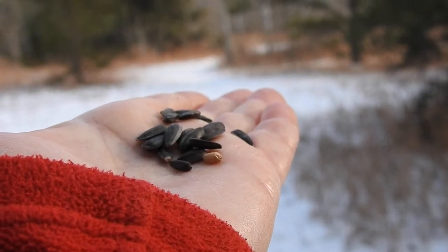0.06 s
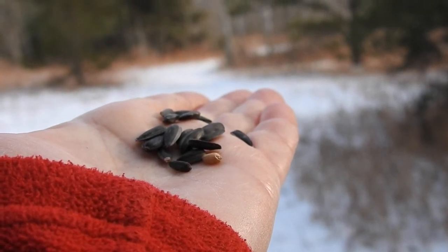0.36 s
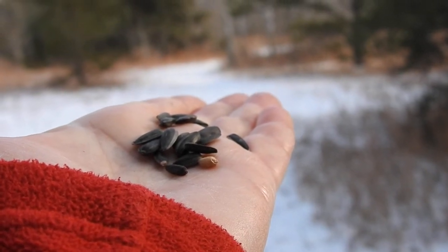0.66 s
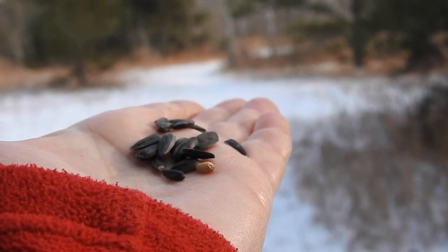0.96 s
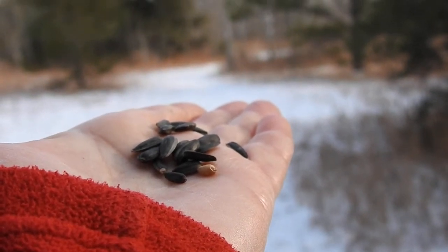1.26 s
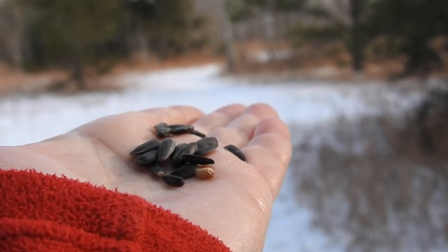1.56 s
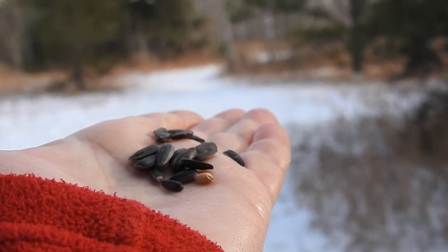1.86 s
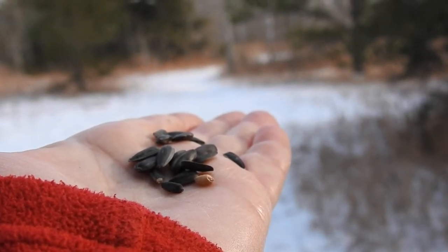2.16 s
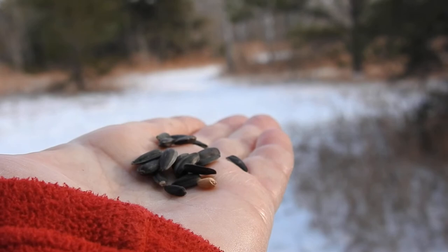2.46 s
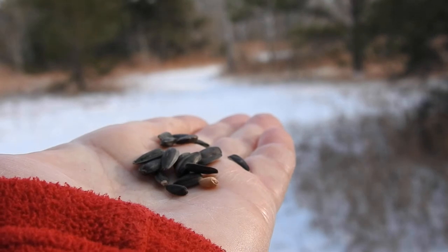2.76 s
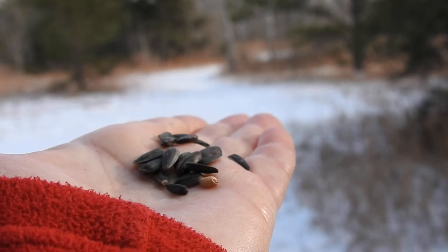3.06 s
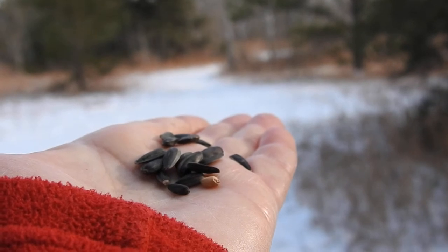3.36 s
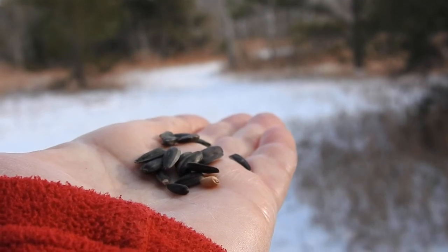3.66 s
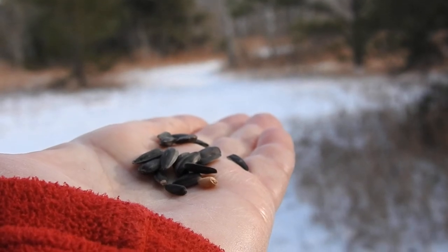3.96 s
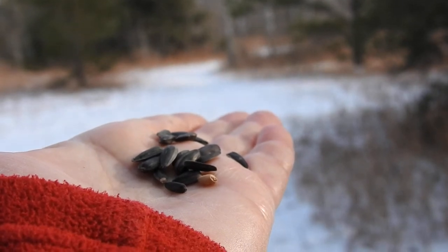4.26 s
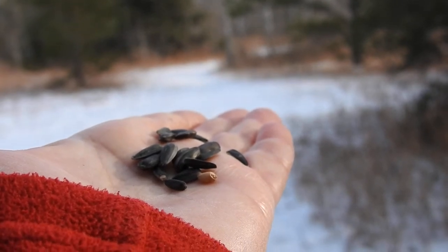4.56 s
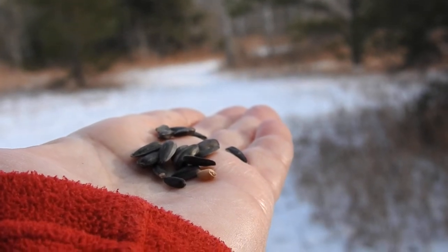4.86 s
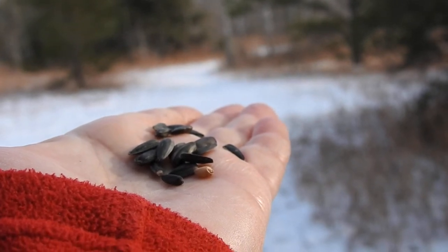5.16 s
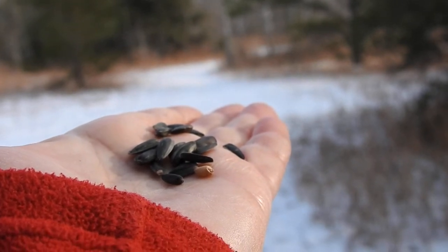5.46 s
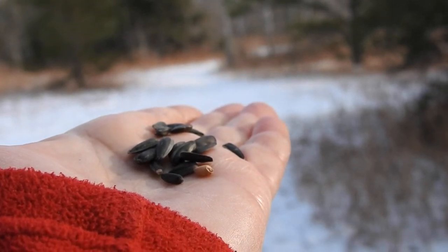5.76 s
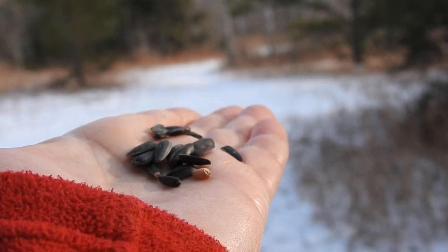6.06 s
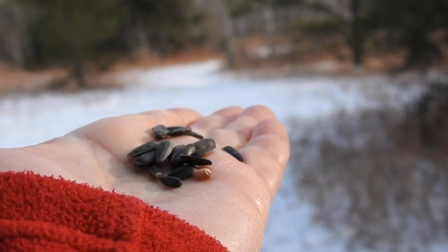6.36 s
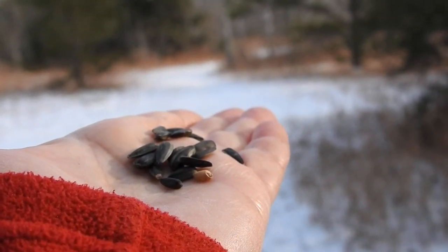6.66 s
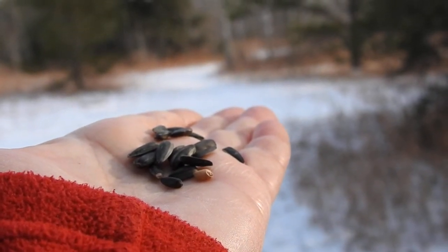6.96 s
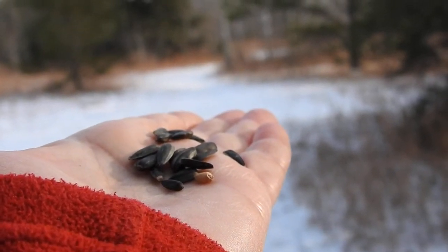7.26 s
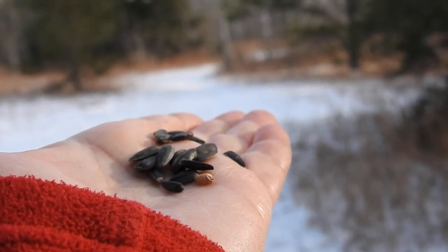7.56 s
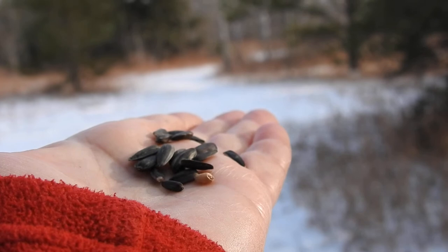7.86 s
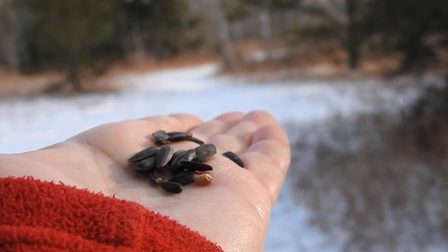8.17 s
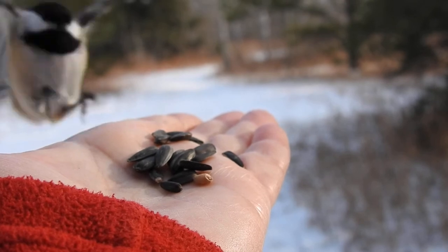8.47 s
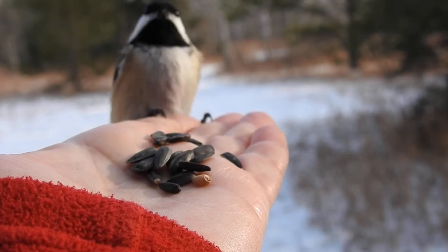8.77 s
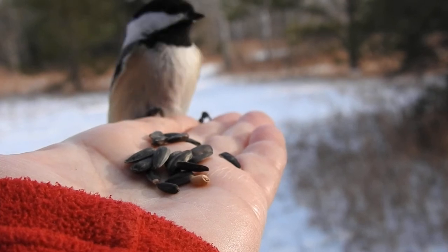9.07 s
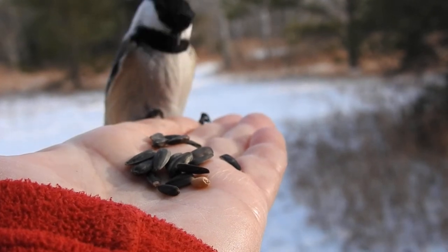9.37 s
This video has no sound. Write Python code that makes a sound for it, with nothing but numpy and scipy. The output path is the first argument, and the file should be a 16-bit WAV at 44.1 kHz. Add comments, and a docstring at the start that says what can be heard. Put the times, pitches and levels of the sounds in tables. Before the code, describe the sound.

Chickadees call close by in snowy woods with short, thin, high whistles and raspier notes. Wings flutter softly, then two sharp chips ring out, the first with a tiny click. A loud twitter with one brief squawk follows, then three loud notes, more wingbeats and softer calls. Faint distant traffic, an engine hum and an even hiss lie underneath, and the trees add a slight echo.

```python
"""Chickadees call around a hand full of seed in snowy woods, over far traffic and an engine hum.
First come thin, high whistles (seets) and lower, raspy notes (tsits), made by each bird's two-sided
voice box. Wings flutter near 3 s, then two sharp chips ring out, the louder with a recorder overload click.
Around 6 s a bird twitters, with one squawk. Three loud tsits follow, then more wingbeats and softer calls.
Trunks scatter the sounds."""
import sys
import numpy as np
from scipy import signal
from scipy.fft import rfft, irfft, next_fast_len
from scipy.io import wavfile
from scipy.ndimage import uniform_filter1d, minimum_filter1d

SR = 44100
rng = np.random.default_rng(int(sys.argv[2]) if len(sys.argv) > 2 else 0)


def master_out(mix):
    """Clip the mix to full scale and print it as 16-bit PCM to the path in sys.argv[1]."""
    frames = np.transpose(np.atleast_2d(mix))
    ceiling = np.clip(frames, -1, 1)
    pcm = np.round(ceiling * 32767).astype(np.int16)
    wavfile.write(sys.argv[1], SR, pcm)


N = 419832
T = np.arange(N) / SR

# One tsit a row: start_s, length_s, top_pitch_hz, level_db, swell_db, rasp_db, left_lead_radians
TSIT_NOTES = [(0.094, 0.056, 6040, -30.5, 5, -20, .25), (2.717, 0.07, 5540, -45.5, -5, -2.5, .4),
              (5.038, 0.04, 5320, -46, -24.5, -9.5, .45), (5.399, 0.054, 5880, -39.5, -9.5, -4, 0.57),
              (6.546, 0.053, 6240, -11.5, -8, -23, -1), (6.774, .053, 6340, -10.5, 4, -24.5, -.9),
              (7.38, 0.047, 6246, -11.5, -2, -25.5, -0.83), (8.474, 0.065, 5590, -36.5, 3, -8, -1.04),
              (8.591, 0.096, 5790, -40.5, -7, -8.5, -1.06), (9.046, 0.075, 5860, -37, 5, -3, -.9),
              (9.12, 0.04, 5430, -38.5, 2, -12, -.8), (9.432, 0.066, 5980, -39.5, -1, -3, -.9)]
# One list of points for each twittered phrase: time_s, pitch_hz, level_db, rasp_db
TWITTER_PHRASES = [
    [(5.800, 5650, -29, -28.5), (5.818, 5900, -12.5, -31), (5.842, 5750, -15, -38.5),
     (5.855, 6020, -25.5, -25.5), (5.873, 6300, -14.5, -23.5), (5.894, 5420, -12.5, -30.5),
     (5.907, 6350, -21, -20), (5.928, 6450, -16.5, -17), (5.947, 5400, -21.5, -15)],
    [(6.059, 5460, -25, -19), (6.074, 6190, -10.5, -19), (6.098, 6300, -15, -18), (6.120, 5600, -29, -17),
     (6.143, 6400, -25.5, -15), (6.165, 6500, -11.5, -19), (6.185, 6100, -19, -18),
     (6.201, 6550, -11, -8.5), (6.215, 5600, -12.5, -6)],
    [(6.277, 5500, -5, -17.5), (6.291, 6080, -10.5, -18.5), (6.312, 6420, -13, -27),
     (6.343, 6254, -9.5, -22), (6.354, 5080, -34, -10)],
]


def undb(db):
    """Turn decibels into a number to multiply by."""
    return 10 ** (np.asarray(db) / 20)


def curves(rows, t):
    """Join the points in each column of a table with straight lines in time."""
    times, *columns = np.transpose(rows)
    return [np.interp(t, times, column) for column in columns]


def unit(x):
    """Scale a sound to an average power of 1."""
    return x / np.sqrt(np.mean(np.abs(x) ** 2))


def coloured(points):
    """Noise whose tone colour follows points of pitch_hz, level_db."""
    hz, db = np.transpose(points)
    all_hz = np.arange(1, N // 2 + 2) * SR / N
    gain = undb(np.interp(np.log(all_hz), np.log(hz), db))
    return unit(irfft(rfft(rng.standard_normal(N)) * gain, N))


def wobble(n, width_hz):
    """A random wobble (complex noise); multiplying a tone by it smears the tone into a band."""
    size = next_fast_len(max(n, SR // 4))
    white = rng.standard_normal(size) + 1j * rng.standard_normal(size)
    band = np.exp(-.5 * (np.fft.fftfreq(size, 1 / SR) / width_hz) ** 2)
    return unit(np.fft.ifft(white * band))[:n]


def turn(hz):
    """How far a wave has turned, in radians, as it follows a pitch curve."""
    return 2 * np.pi * np.cumsum(hz) / SR


def gate(t, length, attack_s, release_s):
    """Fade in, hold and fade out."""
    return np.sin(np.pi / 2 * np.clip(np.minimum(t / attack_s, (length - t) / release_s), 0, 1)) ** 2


def add(out, start_s, sound):
    """Mix a stereo sound in at start_s."""
    i = max(int(start_s * SR), 0)
    out[:, i:i + sound.shape[1]] += sound[:, :N - i]


def stereo(tone, lead, left_db=1):
    """Two close microphone openings hear a tone out of step: the left is ahead by lead radians."""
    half = np.exp(.5j * lead) * undb(left_db / 2)
    return np.sqrt(2) * np.real([tone * half, tone / half])


def hiss(level_db=-59):
    """A faint, even hiss, unrelated on the left and right."""
    # Tone colour of the hiss: pitch_hz, level_db
    colour = [(100, -6), (1500, 0), (3000, 0), (5000, -.5), (6700, 0), (8500, -4), (11000, -8.5),
              (13000, -11), (15500, -12)]
    return undb(level_db) * np.array([coloured(colour), coloured(colour)])


def traffic(rumble_trim_db=1, roar_trim_db=-2, side_db=-16, left_db=1.4, split_hz=500):
    """A far road: rumble and singing tyres swell separately, and an engine drones with a wavering pitch."""
    # Tone colour of the road noise: pitch_hz, level_db
    road_colour = [(20, -45.5), (35, -20.5), (50, -6), (75, -1), (130, -5.5), (250, -8.5), (420, -10),
                   (700, -4.5), (1020, -5), (1250, -16), (1550, -24.5), (2200, -36), (4000, -33.5),
                   (12000, -66.5)]
    # How the traffic rises and falls, before the trims: time_s, rumble_db, roar_db
    road_levels = [(0, -44.5, -48), (1.1, -47.5, -49), (1.5, -48.5, -51.5), (2.6, -49, -47.5),
                   (3.3, -45, -46), (5.1, -45, -47.5), (5.5, -47, -44), (7.2, -46.5, -44.5),
                   (8.2, -49, -49.5), (9.52, -47.5, -45)]
    # The engine's tones, lowest first, before the swell: pitch_hz, level_db
    engine_tones = [(100.5, -52), (202.5, -58.5), (302.5, -56), (404, -61), (512, -58)]
    # Swell of the lowest (firing) tone and of the others: time_s, firing_db, upper_db
    engine_swell = [(0, 0.5, 8.5), (1.3, 6, 6.5), (1.8, -4, 3), (3.1, 2.5, 4), (7, -5.5, -1.5), (7.9, 3, 0),
                    (9.52, 3, 1.5)]
    # Tones sung by the tyre tread: pitch_hz, relative_level_db
    tread_tones = [(594, -13.5), (1032, -13)]
    rumble_db, roar_db = curves(road_levels, T)
    road = coloured(road_colour) + undb(side_db) * np.array([[1], [-1]]) * coloured(road_colour)
    rumble = signal.sosfiltfilt(signal.butter(2, split_hz, fs=SR, output="sos"), road)
    out = unit(rumble) * undb(rumble_db + rumble_trim_db)
    out += unit(road - rumble) * undb(roar_db + roar_trim_db)
    firing_db, upper_db = curves(engine_swell, T)
    speed = 1 + .008054 * wobble(N, .656).real
    for k, (hz, db) in enumerate(engine_tones):
        drone = np.exp(1j * turn(hz * speed)) * (1 + 1.09 * wobble(N, 13))
        out += np.sqrt(2) * unit(drone).real * undb(db + (upper_db if k else firing_db))
    for hz, db in tread_tones:
        whine = np.exp(1j * turn(hz * speed)) * wobble(N, 3.7)
        out += unit(whine.real) * undb(db + 2 * roar_db - roar_db.mean())  # swells more than the roar
    return out * undb(np.array([[left_db], [-left_db]]) / 2)


def woods(sound, snow_delay_s=.0052, snow_db=-14):
    """One early echo comes off the snow, then twigs, trunks and the wider forest scatter the sound."""
    # Hand and twigs, trunks, forest: level_db, seconds to fade by 60 dB
    scatter = [(-15, .13), (-20, .26), (-28, .81)]
    t = np.arange(SR) / SR
    build_up = np.clip(t / .023, 0, 1)
    echoes = sum(undb(db) * unit(rng.standard_normal((2, SR)) * undb(-60 * t / fade_s) * build_up)
                 for db, fade_s in scatter) / np.sqrt(SR)
    echoes[:, int(snow_delay_s * SR)] += undb(snow_db)
    return sound + signal.fftconvolve(sound, echoes, axes=1)[:, :N]


def overload_click(start_s=3.787, level_db=-20, decay_s=.0002):
    """A brief recorder overload click on the loudest chip."""
    out = np.zeros((2, N))
    t = np.arange(SR // 200) / SR
    add(out, start_s, undb(level_db) * rng.standard_normal((2, len(t))) * np.exp(-t / decay_s))
    return out


def wings(beat_hz=23.06, swish_s=.014, thump_s=.012, ruffle=.61, side=.3):
    """Wings beat in short bursts; each stroke swishes through the feathers and pushes a puff of air."""
    # Bursts of wingbeats: start_s, length_s, swish_db, thump_db
    flights = [(2.846, .1, -53, -54), (3.027, .31, -47, -42), (3.438, .19, -51, -61),
               (4.249, .02, -49.5, -70), (7.458, .1, -54.5, -47), (7.673, .06, -50.5, -43),
               (7.909, .1, -53, -47), (8.157, .1, -59, -47), (8.339, .06, -51, -34), (8.413, .06, -57, -53)]
    # Tone colour of the feather swish: pitch_hz, level_db
    feather_colour = [(400, -37), (1200, 5.5), (2300, -1), (3500, -1.5), (5000, 3), (6700, 7.5), (8200, -8),
                      (10000, -15.5), (13000, -38), (16000, -18.5)]
    # Tone colour of the puff of air: pitch_hz, level_db
    air_colour = [(25, -24), (70, 0), (130, 4), (230, 0), (400, -8), (1000, -43), (3000, -70)]
    swish, thump = np.zeros(N), np.zeros(N)
    for start_s, length_s, swish_db, thump_db in flights:
        efforts_db = -2 * rng.standard_normal(20)  # no two strokes are equally strong
        for stroke_s, effort_db in zip(np.arange(start_s, start_s + length_s, 1 / beat_hz), efforts_db):
            near = np.abs(T - stroke_s) < .08
            t = T[near] - stroke_s
            swish[near] += undb(swish_db + effort_db) / (1 + (t / swish_s) ** 2)
            thump[near] += undb(thump_db + effort_db) * np.exp(-.5 * ((t + .014) / thump_s) ** 2)
    swish *= np.exp(ruffle * wobble(N, 150).real)
    feathers = coloured(feather_colour) + side * np.array([[1], [-1]]) * coloured(feather_colour)
    return swish * feathers + thump * coloured(air_colour)


def voice_box(top_hz, contour, db, rasp_db, lead, *, octave_db, under_db, sum_db, breath_db, smear_hz,
              under_width_hz, attack_s, waver, left_db, quiver=.23, buzz=0, buzz_hz=430,
              under_hz=3600, under_hz_per_db=18, beak_hz=5800, breath_width_hz=2700):
    """One side of a bird's voice box whistles; the other adds an unsteady undertone and rasp."""
    n, hz = len(contour), top_hz * contour
    t, length = np.arange(n) / SR, n / SR
    phase = turn(hz * (1 + waver * wobble(n, 160).real))
    whistle = np.exp(1j * phase)
    # the undertone bends with the whistle and sits higher in raspier notes
    undertone = np.exp(1j * turn((under_hz + under_hz_per_db * rasp_db) * contour))
    # the two voices mix into a tone at the sum of their pitches
    second_voice = wobble(n, under_width_hz) * undertone * (undb(under_db) + undb(sum_db) * whistle)
    # swirling air smears the whistle
    swirl = wobble(n, smear_hz) + undb(breath_db) * wobble(n, breath_width_hz)
    rasp = swirl * np.exp(1.06j * phase) + second_voice
    # the beak lets less of the octave out as the pitch climbs
    octave = undb(octave_db) * whistle ** 2 / (1 + (hz / beak_hz) ** 20)
    voice = whistle + octave + undb(rasp_db) * rasp * np.sin(np.pi * t / length) ** .94
    voice *= 1 + quiver * wobble(n, 130).real  # the air flow quivers
    # a forced note breaks into quick, uneven pulses
    pulses = np.cos(turn(buzz_hz * (1 + .92 * wobble(n, 200).real)))
    voice *= np.exp(buzz * pulses - buzz ** 2 / 2)
    return stereo(voice * undb(db) * gate(t, length, attack_s, release_s=.0033), lead * contour, left_db)


def notes(table, start, end, drop_s, hump_db, end_db, arch, sag, bend, **voice):
    """Each note arches up, sags, then snaps down and fades; start and end are shares of its top pitch."""
    out = np.zeros((2, N))
    for start_s, length_s, top_hz, level_db, swell_db, rasp_db, lead in table:
        t = np.arange(int(length_s * SR)) / SR
        hold_s = max(length_s - drop_s, length_s / 4)
        rise = np.clip(t / hold_s, 0, 1)
        fall = np.clip((t - hold_s) / (length_s - hold_s), 0, 1)
        droop = sag * rise ** 5 * (1 - fall)
        scoop = (1 - start) * (1 - rise) ** arch
        snap = (1 - end) * np.sin(np.pi / 2 * fall ** bend) ** 2
        db = level_db + swell_db * (rise - .5) - hump_db * (2 * rise - 1) ** 2
        db += np.minimum(end_db - db, 0) * fall ** .8
        add(out, start_s, voice_box(top_hz, 1 - droop - scoop - snap, db, rasp_db, lead, **voice))
    return out


def flicks(length_s=.02, ahead_s=.016, pause_s=.08, low_hz=2600, high_hz=3750, level_db=-39):
    """After a pause, the voice box winds up for a tsit or twitter: a faint glide, then one an octave up."""
    out = np.zeros((2, N))
    progress = np.linspace(0, 1, int(length_s * SR / 2))
    glide_hz = low_hz + (high_hz - low_hz) * progress
    fade = np.sin(np.pi * progress) ** 2
    calls = [(start_s, start_s + note_s) for start_s, note_s, *_ in TSIT_NOTES]
    calls += [(phrase[0][0], phrase[-1][0]) for phrase in TWITTER_PHRASES]
    last_end_s = -np.inf
    for (start_s, end_s), chance in zip(sorted(calls), rng.standard_normal(len(calls))):
        if start_s - last_end_s > pause_s:
            tone = np.exp(1j * turn(glide_hz * (1 + .025 * chance)))
            voice = np.concatenate([undb(-10) * tone * fade, tone ** 2 * fade])
            add(out, start_s - ahead_s, stereo(voice * undb(level_db), 0))
        last_end_s = end_s
    return out


def seets():
    """Thin, high, nearly pure whistles."""
    # One seet a row: start_s, length_s, top_pitch_hz, level_db, swell_db, rasp_db, left_lead_radians
    seet_notes = [(.165, 0.051, 7830, -29, 0, -48, -1), (.322, 0.076, 6890, -43, -11, -15, -1.25),
                  (.530, 0.056, 7970, -31.5, -4, -46, -0.65), (1.683, 0.047, 7390, -28, -1, -27, -1.6),
                  (3.365, .077, 8480, -26, -10, -33, -1.76), (3.502, .066, 7900, -17.5, -11, -47, -1.64),
                  (3.626, 0.064, 7550, -21.5, -0.5, -37.5, -1.85), (7.508, .067, 7800, -49, -6, -28, -1.7),
                  (8.361, 0.1, 7740, -54, -18, -18, -1.47), (9.424, 0.053, 7230, -25.5, 0, -21, -1)]
    return notes(seet_notes, start=.882, end=.6, drop_s=.012, hump_db=5.5, end_db=-41.5, arch=2.4,
                 sag=.014, bend=.63, octave_db=-44, under_db=-7.5, sum_db=-26, breath_db=-12.5,
                 smear_hz=678, under_width_hz=400, attack_s=.0016, waver=.0037, left_db=.5)


def tsits():
    """Lower arching notes with a breathy undertone and an octave above."""
    return notes(TSIT_NOTES, start=.875, end=.56, drop_s=.012, hump_db=7, end_db=-59, arch=2.81,
                 sag=.035, bend=1.1, octave_db=-27, under_db=-11.5, sum_db=-22, breath_db=-4.5,
                 smear_hz=894, under_width_hz=314, attack_s=.0027, waver=.022, left_db=1)


def chips(windup_s=.029, held_hz=7240, climbing_hz=5970, lead=1.7):
    """Two buzzing voices wind up, one held high and one climbing, then break into a hard, steep arch."""
    # Hard notes from close by: start_s, length_s, top_pitch_hz, level_db, rasp_db, windup_db, buzz_0_to_1
    chip_notes = [(3.785, .028, 7630, -9.5, -18.5, -23.5, .3), (4.053, .019, 6870, -10, -6, -22, 1)]
    out = np.zeros((2, N))
    for start_s, length_s, top_hz, level_db, rasp_db, windup_db, buzz in chip_notes:
        forced = dict(octave_db=-41.5, under_db=-18, sum_db=-35, breath_db=-29.5, smear_hz=1022,
                      under_width_hz=440, attack_s=.0026, sag=0, bend=.79, waver=.02, left_db=1.5,
                      buzz=buzz, buzz_hz=301.6)
        held = (start_s - windup_s, windup_s + length_s / 2, held_hz, windup_db + 2.5, 10, -12, lead)
        climb = (start_s - windup_s, windup_s + .0044, climbing_hz, windup_db - 4, 27, -7, lead)
        peak = (start_s, length_s, top_hz, level_db, -3, rasp_db, lead)
        out += notes([held], start=.86, end=.5, drop_s=.006, hump_db=3, end_db=-32, arch=1.5, **forced)
        out += notes([climb], start=.56, end=.42, drop_s=.0037, hump_db=3, end_db=-23.5, arch=.6, **forced)
        out += notes([peak], start=.78, end=.54, drop_s=.009, hump_db=0, end_db=-27, arch=.78, **forced)
    return out


def squawk(start_s=6.214, length_s=.064, level_db=-14.5, drop_s=.014, lead=-.068):
    """Both sides of the voice box shake wildly over a slower third vibration and mix into new tones."""
    out = np.zeros((2, N))
    t = np.arange(0, length_s, 1 / SR)
    n = len(t)
    fall = np.clip(1 - (length_s - t) / drop_s, 0, 1)
    # the low voice climbs, the middle one holds, the high one drops at the end
    pitches_hz = 896 + 8500 * t, np.full(n, 3380), 6370 - 900 * fall
    low, middle, high = (np.exp(1j * turn(hz)) for hz in pitches_hz)
    # multiplying two tones adds their pitches; dividing subtracts them
    treble = high * (wobble(n, 600) + undb(-4) * low * wobble(n, 980) + undb(-15) * wobble(n, 3090))
    body = undb(-17) * low * wobble(n, 63)
    body += middle * (undb(-5) * wobble(n, 330) + undb(-19) / low * wobble(n, 490))
    loudness = undb(level_db - 3 * fall) * gate(t, length_s, attack_s=.0085, release_s=.0035)
    # longer waves reach left and right more nearly in step
    add(out, start_s, unit(stereo(treble, lead) + stereo(body, lead / 4)) * loudness)
    return out


def twitters(lead=-.7, glide_s=.005):
    """The whistle swings up and down without a break, over a clear undertone."""
    out = np.zeros((2, N))
    for phrase in TWITTER_PHRASES:
        t = np.arange(phrase[0][0], phrase[-1][0], 1 / SR)
        hz, db, rasp_db = curves(phrase, t)
        contour = uniform_filter1d(hz, int(glide_s * SR)) / hz.max()
        warble = voice_box(hz.max(), contour, db, rasp_db, lead, octave_db=-28.5, under_db=-4, sum_db=-10,
                           breath_db=-2.5, smear_hz=900, under_width_hz=160, attack_s=.008, waver=.018,
                           left_db=.5, under_hz=3400, under_hz_per_db=6.5, quiver=.33)
        add(out, t[0], warble)
    return out


def scene():
    """Birds and one overload click, given the echo of the woods, over the far road."""
    calls = seets() + tsits() + twitters() + chips() + flicks()
    click = overload_click()
    birds = calls + squawk() + wings()
    return woods(birds + click) + traffic() + hiss()


def record(dry, ceiling=.8, top_hz=15750):
    """A limiter turns down the loudest peaks, and the highest treble is cut."""
    allowed_gain = np.minimum(1, ceiling / (np.abs(dry).max(axis=0) + 1e-9))
    smooth_gain = uniform_filter1d(minimum_filter1d(allowed_gain, size=90), size=90)
    return signal.sosfilt(signal.ellip(10, .1, 70, top_hz, fs=SR, output="sos"), dry * smooth_gain)


dry = scene()
out = record(dry)
master_out(out)
```